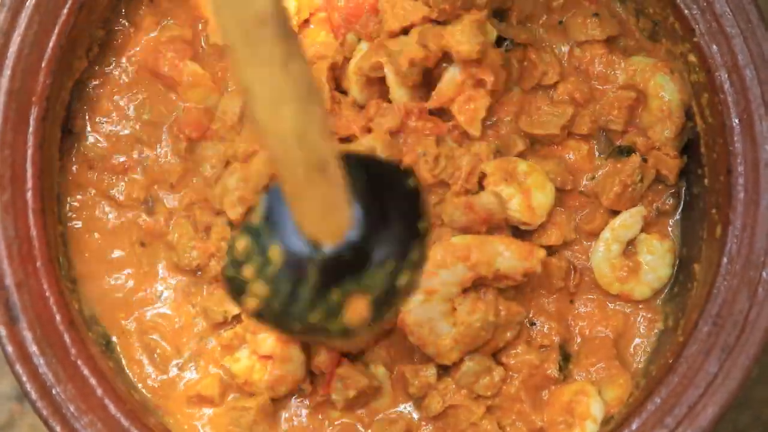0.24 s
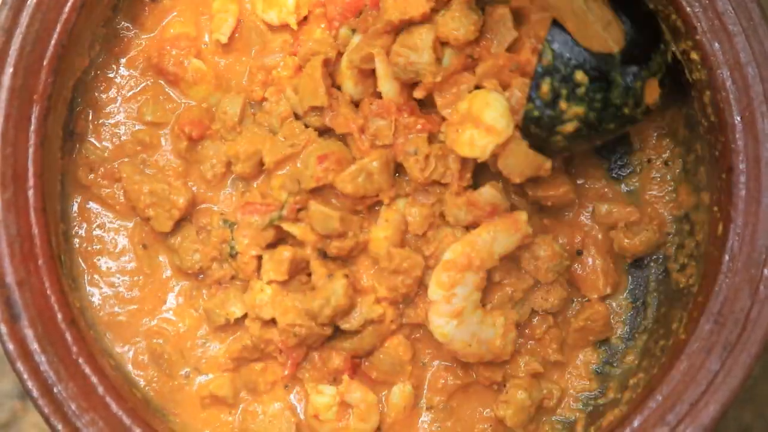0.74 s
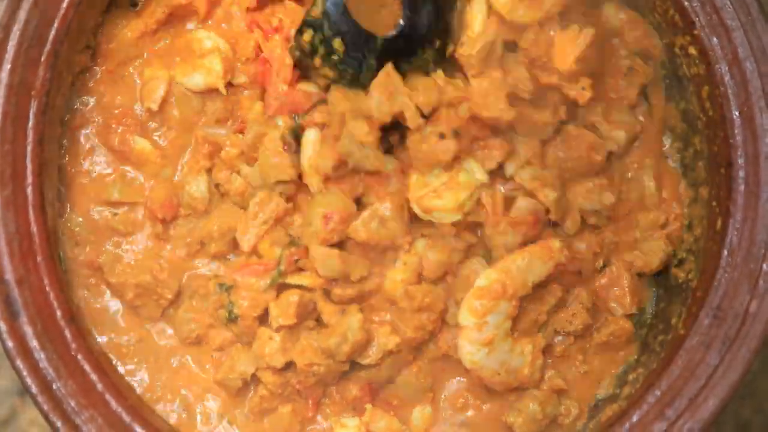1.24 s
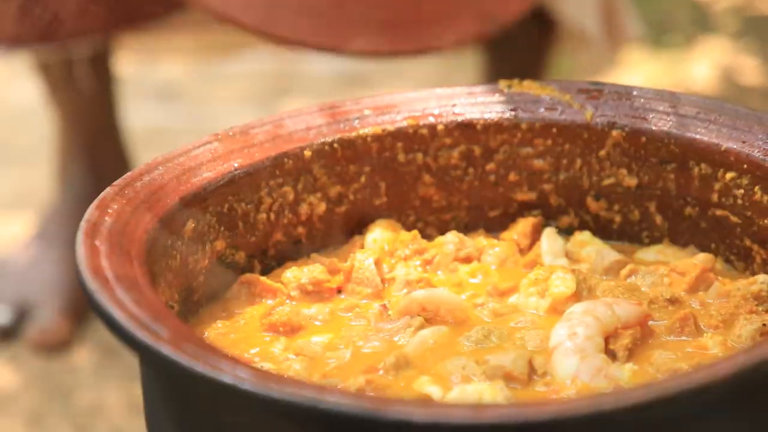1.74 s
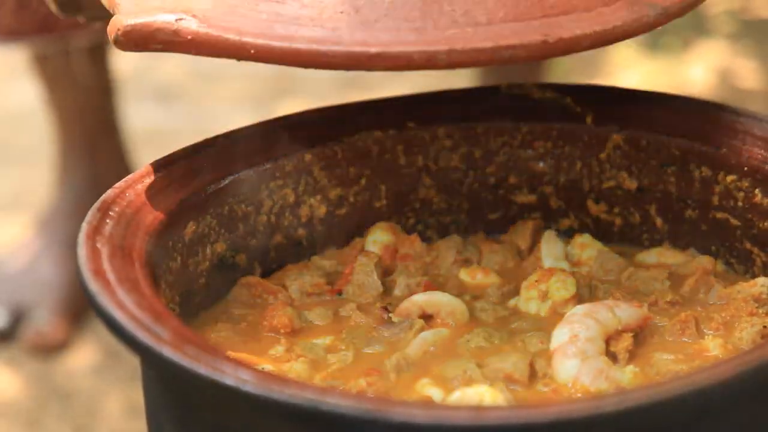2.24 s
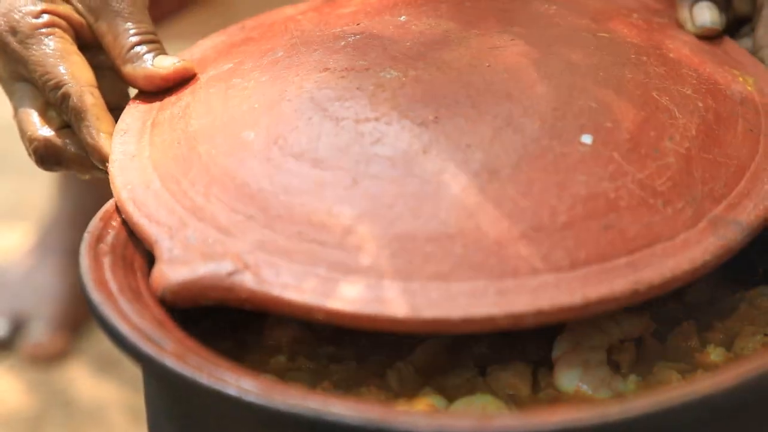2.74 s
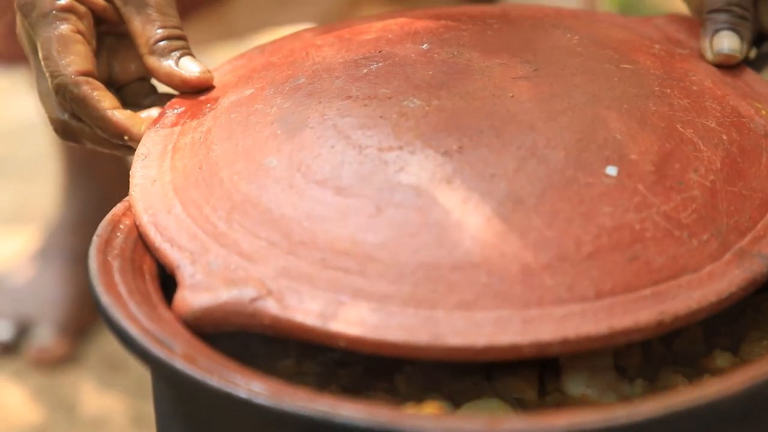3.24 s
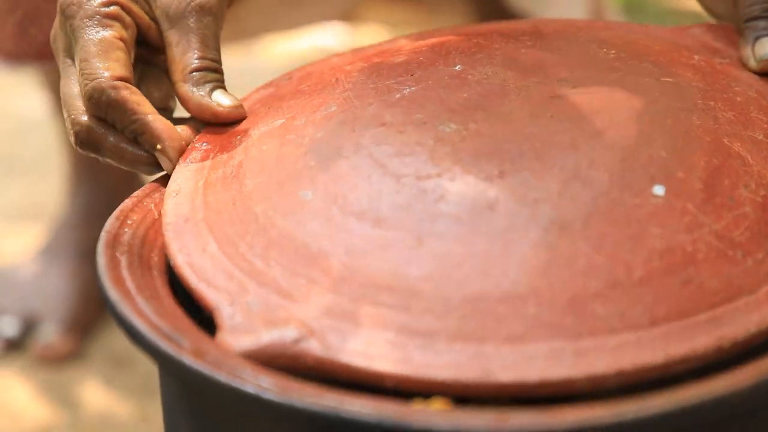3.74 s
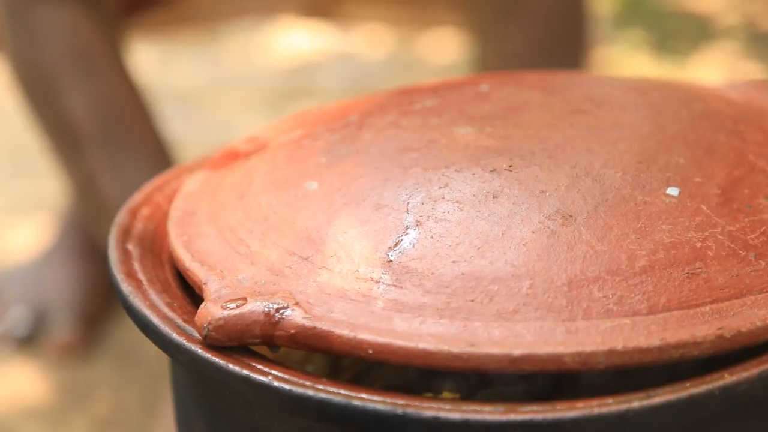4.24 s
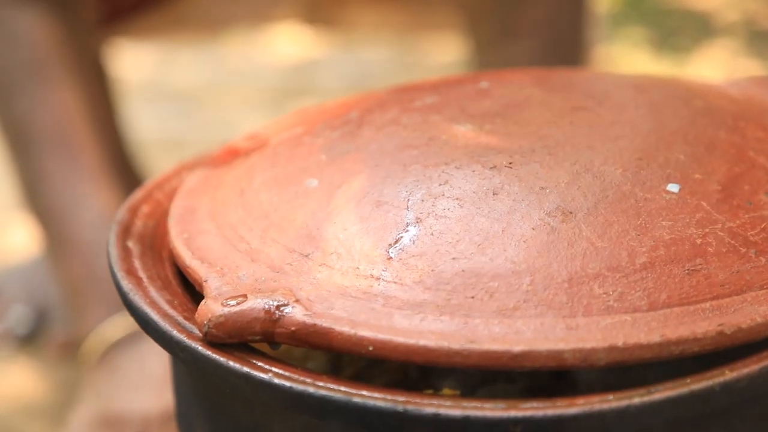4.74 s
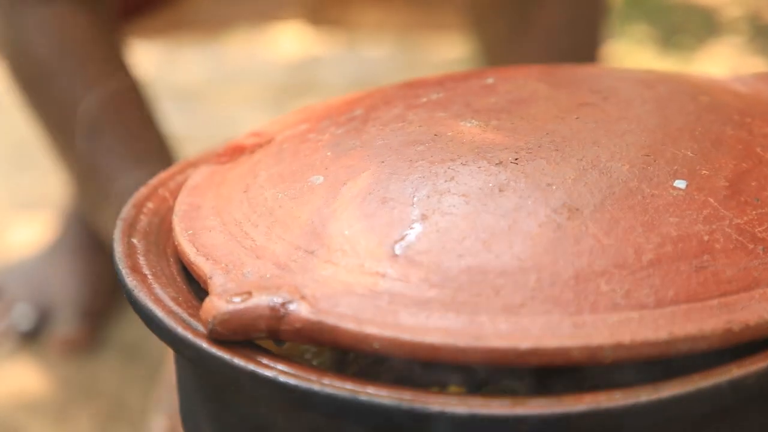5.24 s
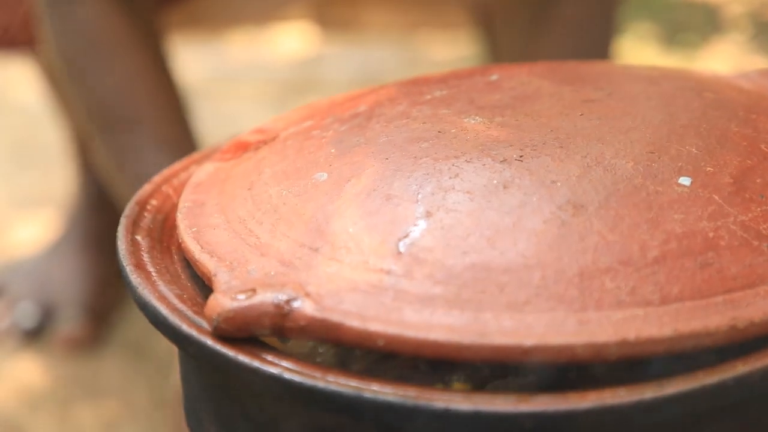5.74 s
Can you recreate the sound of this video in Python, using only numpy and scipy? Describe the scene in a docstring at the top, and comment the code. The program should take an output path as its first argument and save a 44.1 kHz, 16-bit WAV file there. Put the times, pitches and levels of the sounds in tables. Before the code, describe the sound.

Outdoors, close to a simmering clay pot, a coconut-shell ladle scrapes gritty clay, knocks sharply twice and ends in a short squeal. A heavy clay lid lands with hollow bumps and grinds into place. Afterwards feet crunch dry grit and the lid settles with small knocks. A bird gives four falling whistles with echoes from trees, over faint fizz and open air.

```python
"""Outdoors, curry simmers in a clay pot: fine fizz and wet ticks over open air and a low distant rumble.
A coconut-shell ladle scrapes gritty clay, knocks shell and pot into ringing, then sticks and slips into a squeal.
The clay lid lands with hollow bumps of trapped air and grinds into place; feet crunch dry grit.
A bird whistles pure falling notes, and the ground and trees send back echoes."""
import sys
import numpy as np
from scipy import signal
from scipy.fft import rfft, irfft
from scipy.io import wavfile
from scipy.ndimage import uniform_filter1d

SR = 44100
rng = np.random.default_rng(int(sys.argv[2]) if len(sys.argv) > 2 else 0)


def bounce(signal):
    """Save signal as a 16-bit WAV file at the path given by the first command-line argument."""
    frames = np.transpose(np.atleast_2d(signal))
    limited = np.clip(frames, -1, 1)
    pcm = np.round(limited * 32767).astype(np.int16)
    wavfile.write(sys.argv[1], SR, pcm)


N = 264600
TIME = np.arange(N) / SR

# ringing modes of the coconut shell: (frequency [Hz], level [dB], time to fall 60 dB [s])
SHELL_MODES = [(525, -22, 0.075), (763, -3, 0.017), (1376, -17.5, 0.04), (1632, -2.5, 0.019),
               (1838, -3.5, 0.019), (2190, -7.5, 0.016), (2544, 0, 0.0061), (3120, -23, 0.035),
               (3580, -20.5, 0.015), (6550, -36, 0.0065), (6940, -37, 0.0065)]
# ringing modes of the filled pot: (frequency [Hz], level [dB], time to fall 60 dB [s])
POT_MODES = [(464, -43, 0.031), (525, -7, 0.055), (711, -9, 0.069), (772, -11, 0.098), (867, -14, 0.073),
             (1111, -3.5, 0.039), (1218, -13, 0.18), (1330, -4.5, 0.034), (1600, -11.5, 0.081),
             (1655, -8, 0.039), (1733, -9, 0.085), (1850, -1.5, 0.028), (2000, -15, 0.066),
             (2075, -16, 0.2), (2300, -28, 0.24), (2513, -11.5, 0.043), (2820, -17.5, 0.073),
             (2987, -14, 0.055), (3190, -13, 0.014)]
# modes of the air trapped under the lid: (frequency [Hz], level [dB], time to fall 60 dB [s])
HOLLOW_MODES = [(128, -15, 0.15), (191, -18, 0.046), (451, 3.5, 0.025), (514, 3, 0.031)]
# ringing modes of the clay lid: (frequency [Hz], level [dB], time to fall 60 dB [s])
LID_MODES = [(625, -7, 0.015), (840, -6, 0.0087), (968, -12.5, 0.095), (1208, -20, 0.11),
             (1547, -4.5, 0.025), (1910, -2.5, 0.008), (2376, -2, 0.015), (2930, -9, 0.017),
             (3900, -16, 0.015), (4560, -18.5, 0.023), (5960, -16, 0.018), (6800, -36, 0.016),
             (7600, -15, 0.0077)]
# spectrum of clay grains catching: (frequency [Hz], level per Hz [dB])
GRAIN_SPECTRUM = [(200, -4.5), (500, -7), (780, 1.5), (1100, -4.5), (1900, -9.5), (2800, -4.5),
                  (4200, -16.5), (5200, -22.5), (6600, -11), (8000, -19), (10000, -17), (13000, -32),
                  (16000, -44)]
# spectrum of bright hiss and crunch: (frequency [Hz], level per Hz [dB])
RUSTLE_SPECTRUM = [(1000, -12), (3000, -16), (5000, 1), (7000, 8.5), (10000, 5), (13000, 0.5), (16000, -20)]
# the whole level dips briefly: (time [s], half length [s])
LEVEL_DIPS = [(1.526, 0.02), (3.957, 0.027)]


def from_db(db):
    """Turn decibels into a gain."""
    return 10 ** (np.asarray(db) / 20)


def rms_one(x):
    """Scale a signal to an rms (average strength) of 1."""
    return x / np.sqrt(np.mean(x ** 2) + 1e-20)


def colour(x, spectrum):
    """Give a steady signal a spectrum, with softer skirts beyond the table's ends; rms 1."""
    hz, db = np.transpose(spectrum)
    f = np.maximum(np.arange(N // 2 + 1) * SR / N, 1)
    skirts = np.minimum(f / hz[0], 1) ** 2 * np.minimum(hz[-1] / f, 1) ** 2
    gain = from_db(np.interp(np.log(f), np.log(hz), db))
    return rms_one(irfft(rfft(x) * skirts * gain, N))


def cut(x, hz, kind="low", order=2):
    """Filter away part of the spectrum (Butterworth)."""
    safe_hz = np.clip(hz, 10, SR / 2 - 500)
    return signal.sosfilt(signal.butter(order, safe_hz, kind, fs=SR, output="sos"), x + 1e-18)


def drift(top_hz):
    """Smooth random wandering with a spread of 1, no faster than about top_hz."""
    return rms_one(cut(rng.standard_normal(N), top_hz))


def click(s):
    """One click of height 1 at time s."""
    return 1. * (np.arange(N) == round(s * SR))


def fade(age, t60):
    """Die away by 60 dB in each t60 seconds, starting at age 0."""
    return from_db(-60 * np.clip(age / t60, 0, 4))


def burst(s, t60):
    """Noise that starts at once and dies away."""
    return rng.standard_normal(N) * (TIME >= s) * fade(TIME - s, t60)


def ring(force, modes, ratio=1, alternate=False):
    """Let a force set off decaying tones; a click of height 1 starts each mode at its table level."""
    out = np.zeros(N)
    for k, (hz, db, t60) in enumerate(modes):
        decay = np.exp(-np.log(1000) / (t60 * SR))
        turn = 2 * np.pi * hz * ratio / SR
        sign = (-1) ** k if alternate else 1
        feedback = [1, -2 * decay * np.cos(turn), decay * decay]
        out += sign * from_db(db) * signal.lfilter([0, np.sin(turn)], feedback, force + 1e-18)
    return out


def grains(per_s, spread_db):
    """Random tiny collisions of uneven size; rms 1."""
    sizes = from_db(spread_db * np.minimum(rng.exponential(1, N), 4)) * rng.choice([-1, 1], N)
    return rms_one(sizes * (rng.random(N) < per_s / SR))


def steady(x):
    """Even out the slow level, so that the hand's pressure can set it."""
    return x / np.sqrt(np.abs(uniform_filter1d(x * x, size=900)) + 1e-12)


def bell(x, centre, half):
    """A smooth hump of height 1 that has sunk to 0.61 at half from its centre."""
    return np.exp(-np.minimum(((x - centre) / half) ** 2, 100) / 2)


def stroke(start, length, attack_s, release_t60):
    """Envelope of a movement: a straight rise, a hold until its length is over, then a dying away."""
    age = TIME - start
    return np.clip(age / attack_s, 0, 1) * fade(age - length, release_t60)


def background(air_db=-44, rumble_db=-54, simmer_db=-58, sizzle_db=-41):
    """Noise makes open air and a swelling distant rumble; tiny collisions make the sauce's fizz."""
    # spectrum of the open air: (frequency [Hz], level per Hz [dB])
    air_spectrum = [(15, -45), (25, -14), (92, -9), (206, -6.5), (242, -13.5), (270, -8), (301, -14.5),
                    (796, -18), (1100, -14.5), (1520, -18.5), (1890, -16.5), (3430, -23), (5570, -42),
                    (10100, -37.5), (16000, -50.5)]
    # spectrum of the simmering sauce: (frequency [Hz], level per Hz [dB])
    simmer_spectrum = [(2000, 14.5), (5000, 11), (7000, 14.5), (10000, 8.5), (13000, 5), (16000, -20)]
    # swells of the rumble: (time of the peak [s], half length [s], level [dB])
    rumble_swells = [(2.376, 0.11, -46), (5.4, 0.61, -58)]
    air = from_db(air_db) * colour(rng.standard_normal(N), air_spectrum)
    swells = from_db(rumble_db) + sum(from_db(db) * bell(TIME, s, half) for s, half, db in rumble_swells)
    rumble = swells * rms_one(cut(rng.standard_normal(N), [82, 118], "band"))
    # sauce pushed up the hot wall sizzles
    sizzle = from_db(sizzle_db) * stroke(1.365, length=0.051, attack_s=0.051, release_t60=0.13)
    heat = from_db(simmer_db) + sizzle
    return air + rumble + heat * colour(grains(10000, 4.6), simmer_spectrum)


def ladle_grit(pot_db=-4, attack_s=0.002, sag_db=4.5):
    """Grains of bare clay catch the rubbing shell in clumps and stir the pot's modes."""
    # scrapes: (start [s], length [s], level [dB], time to fall 60 dB on release [s])
    scrapes = [(0, 0.043, -27.5, 0.088), (0.511, 0.066, -28.5, 0.22), (0.687, 0.098, -27, 0.034)]
    pressure = np.zeros(N)
    for s, length, db, t60 in scrapes:
        sag = sag_db * bell(TIME, s + length / 2, length / 4)   # each scrape bites hardest at its two ends
        pressure += stroke(s, length, attack_s, t60) * from_db(db - sag)
    force = grains(4000, 3.6) * from_db(2.5 * drift(110))
    pot = rms_one(ring(force, POT_MODES, alternate=True))
    return pressure * steady(colour(force, GRAIN_SPECTRUM) + from_db(pot_db) * pot)


def ticks(t60=0.031, top_hz=11000):
    """Wet ticks of the sauce and small grit clicks: short bright bursts of noise."""
    # ticks: (time [s], level before a 3 dB cut and the filter [dB])
    tick_list = [(.161, -32), (.962, -30.5), (1.257, -32.5), (1.3014, -23), (1.3944, -14), (3.808, -30.5),
                 (4.1533, -20.5), (5.335, -29)]
    spits = sum(from_db(db - 3.0) * burst(s, t60) for s, db in tick_list)
    return cut(spits, [6500, top_hz], "band")


def ladle_knocks(contact_width=1.31, crack_t60=0.0079, crack_hz=8000, tail_db=-27, tail_t60=0.079):
    """Each knock rings the shell and pot, over a dry crack and a faint scatter from the yard."""
    # knocks: (time [s], level [dB], pitch of the contact [Hz], pot ring [dB], crack [dB])
    knocks = [(0.5138, 1, 990, -24, -10.5), (.5453, -15, 547, -31, -26), (0.815, -21.5, 2600, -24, -4),
              (1.171, 5.5, 2300, -18, -8.5), (1.199, -22, 1520, -6.5, -30)]
    out = np.zeros(N)
    for s, db, contact_hz, pot_db, crack_db in knocks:
        contact_band = [contact_hz / contact_width, contact_hz * contact_width]
        force = 0.99 * cut(click(s), contact_band, "band", order=1)
        body = ring(force, SHELL_MODES) + from_db(pot_db) * ring(force, POT_MODES, alternate=True)
        crack = from_db(crack_db) * cut(burst(s, crack_t60), [330, crack_hz], "band")
        scatter = from_db(tail_db) * cut(burst(s, tail_t60), [400, 2600], "band")
        out += from_db(db) * (body + crack + scatter)
    return out


def drag_pressure(attack_s=.082, release_t60=0.055, ease_db_per_s=140):
    """The hand leans into each drag, then eases off towards a lighter, steady push."""
    # drags along the wall under the curry: (start [s], end [s], lean at its peak [dB], steady push [dB])
    drags = [(0.824, 1.29, -19, -47.5), (1.29, 1.501, -17.5, -28.5)]
    out = np.zeros(N)
    for s, end, peak_db, held_db in drags:
        lean = from_db(peak_db - ease_db_per_s * np.maximum(TIME - s - attack_s, 0))
        out += stroke(s, end - s, attack_s, release_t60) * (lean + from_db(held_db))
    return out


def stick_slip(pressure, judder_per_s=565, judder_rough=.65, squeal_rough=.07, slack_rough=.24):
    """Slips per second and their roughness: an uneven judder locks into a squeal."""
    # pitch of the squeal: (time [s], slips per second [Hz])
    squeal_pitch = [(1.325, 660), (1.345, 565), (1.362, 588), (1.386, 597), (1.405, 576), (1.428, 594),
                    (1.485, 556), (1.51, 575)]
    lock_start_s, lock_s = 1.31, .05
    squeal_s, squeal_hz = np.transpose(squeal_pitch)
    per_s = np.where(TIME < lock_start_s, judder_per_s, np.interp(TIME, squeal_s, squeal_hz))
    # the squeal is cleanest under full pressure and roughens as the hand eases off
    eased_rough = squeal_rough + slack_rough * (1 - pressure / pressure.max())
    locked = np.clip((TIME - lock_start_s) / lock_s, 0, 1)
    return per_s, judder_rough + locked * (eased_rough - judder_rough)


def ladle_drag(jitter=0.32, uneven_db=10.0, shell_db=-3, hiss_db=-35, low_cut_hz=800, soft_hz=3200,
               churn_db=-13, stray_db=-12):
    """The shell sticks and slips on the wall; when the slips lock into step it squeals."""
    pressure = drag_pressure()
    per_s, rough = stick_slip(pressure)
    turns = np.cumsum(per_s * np.exp(jitter * rough * drift(350))) / SR
    # one slip for each whole turn, of uneven size
    slips = np.diff(np.floor(turns), prepend=0) * from_db(uneven_db * rough * rng.standard_normal(N))
    # other spots of the shell catch out of step
    slips = steady(slips) + from_db(stray_db) * grains(700, 3.5)
    # the sauce softens every slip
    slips = cut(cut(slips, soft_hz, order=4), low_cut_hz, "high")
    pot = ring(slips, POT_MODES, alternate=True)
    body = steady(pot + from_db(shell_db) * ring(slips, SHELL_MODES))
    # the moving ladle loads the wall, so the ringing wanders a little in pitch
    body = np.interp(TIME + .00016 * rough * drift(14), TIME, body)
    # soft pieces rub the wall and wake mostly its low modes
    pieces = cut(grains(2500, 3.8), [430, 850], "band")
    churn = steady(ring(pieces, POT_MODES))
    hiss = colour(grains(2500, 4), RUSTLE_SPECTRUM)
    return pressure * (body + from_db(churn_db) * churn + from_db(hiss_db) * hiss)


def whistle(top_hz=6060, end_hz=2120, half_fall_s=.0765, steepness=3.55, level_db=-13):
    """One pure note hangs high, falls fast and levels out, loudest as its pitch falls through about 3 kHz."""
    swell_hz, swell_octaves, swell_db = 3067, 0.2, 11.5
    hz = end_hz + (top_hz - end_hz) / (1 + (TIME / half_fall_s) ** steepness)
    db = level_db + swell_db * bell(np.log2(hz), np.log2(swell_hz), swell_octaves)
    envelope = stroke(0, length=0.16, attack_s=0.023, release_t60=0.061)
    return envelope * from_db(db) * np.sin(2 * np.pi * np.cumsum(hz) / SR)


def bird(near_t60=0.36, far_t60=.6, far_db=-16, leaf_hz=3300, flutter_db=2, ground_s=.0021, ground_db=-12,
         fade_in_s=0.042):
    """The same whistle repeats; it beats with its ground echo, and trees scatter it into a trail."""
    # calls: (start [s], level [dB], tree echo [dB])
    calls = [(1.436, -21.5, -3), (2.711, -19, -3), (3.82, -27, 2), (4.976, -25, 0.5)]
    note, out = whistle(), np.zeros(N)
    for s, level_db, echo_db in calls:
        call = (note * from_db(flutter_db * drift(104)))[:SR // 2]
        trees = burst(s + .009, near_t60) + from_db(far_db) * burst(s + .009, far_t60)
        trees = cut(trees, leaf_hz, "high")   # leaves throw back the high start of the note best
        trees = trees / np.sqrt(np.sum(trees ** 2))
        ground = from_db(ground_db) * click(s + ground_s)
        paths = click(s) + ground + from_db(echo_db) * trees
        heard = from_db(level_db) * signal.oaconvolve(paths, call)[:N]
        for dip_s, _ in LEVEL_DIPS:
            if s < dip_s < s + .5:   # a call begun just before a dip is silent until it, then fades in
                heard = heard * np.clip((TIME - dip_s) / fade_in_s, 0, 1)
        out += heard
    return out


def shuffles(scuff_db=-1, sole_db=-51, feet_db=-59, restless_db=4.0, scuffs_per_s=220):
    """Each move of a foot crunches dry grit over a dull rub of the sole."""
    # shuffles: (time of the peak [s], half length [s], level [dB])
    shuffle_list = [(1.898, 0.0097, -53), (4.161, 0.021, -45.5), (4.235, 0.013, -53), (4.33, 0.008, -56),
                    (4.654, 0.07, -53), (5.414, 0.025, -47), (5.728, 0.036, -44)]
    # spectrum of the rubbing sole: (frequency [Hz], level per Hz [dB])
    scuff_spectrum = [(150, -54), (500, 23.5), (900, 5), (1500, 13), (2500, 7.5), (5000, -1.5)]
    moves = sum(from_db(db) * bell(TIME, s, half) for s, half, db in shuffle_list)
    # between shuffles the feet keep shifting their weight
    shifting = stroke(4.1, length=1.46, attack_s=0.016, release_t60=0.24) * from_db(restless_db * drift(9))
    crunch = colour(grains(3500, 3.2) * from_db(2.4 * drift(70)), RUSTLE_SPECTRUM)
    scuff = colour(grains(scuffs_per_s, 3), scuff_spectrum)
    crunch_level = moves + from_db(feet_db) * shifting
    scuff_level = from_db(scuff_db) * moves + from_db(sole_db) * shifting
    return crunch_level * crunch + scuff_level * scuff


def lid_bumps(clay_db=-2, rattle_db=-7.0, rattle_t60=0.13, rock_s=0.004175, rock_db=0):
    """The lid lands, rocks onto a second point and pumps the pot's air, which booms as the rim rattles."""
    # bumps: (time [s], level [dB], pitch of the trapped air [ratio], hardness [Hz], boom [dB])
    bumps = [(2.848, -14.5, 1.16, 1020, 2), (2.972, -15, 1.05, 840, 2), (3.077, -16, 1.06, 1110, 4),
             (3.592, -28.5, 0.79, 2520, 4.5), (3.807, -32.5, .76, 4940, 2.5), (4.17, -28, 0.77, 2740, -11),
             (4.272, -35, 1.22, 1200, -0.5), (4.579, -25.5, 1.22, 1800, -11.5),
             (4.817, -17, 1.285, 1040, -10), (5.892, -29, 1.18, 920, -14)]
    out = np.zeros(N)
    for s, db, ratio, hard_hz, boom_db in bumps:
        second_point = from_db(rock_db) * cut(click(s + rock_s), hard_hz)
        force = cut(click(s) + second_point, hard_hz)
        boom = from_db(boom_db) * ring(force, HOLLOW_MODES, ratio, alternate=True)
        clay = from_db(clay_db) * ring(force, LID_MODES, alternate=True)
        rattle = cut(cut(burst(s, rattle_t60), hard_hz, order=3), 310, "high")
        out += from_db(db) * (boom + clay + 2 * from_db(rattle_db) * rattle)
    return out


def lid_slide(closed_ratio=0.916, hollow_db=1.5, sand_db=-20, rub_db=-9, release_t60=0.3, wobble_hz=26.4,
              wobble_db=2.5):
    """Clay grinds on clay as the lid wobbles; with the gap nearly shut the trapped air sounds lower."""
    # pushes along the rim: (start [s], length [s], level [dB], attack [s])
    pushes = [(3.035, 0.1, -40, 0.013), (3.447, 0.11, -32, .055), (3.588, 0.057, -33, 0.0044)]
    pressure = np.zeros(N)
    for s, length, db, attack_s in pushes:
        wobble = wobble_db * np.cos(2 * np.pi * wobble_hz * (TIME - s))
        pressure += stroke(s, length, attack_s, release_t60) * from_db(db + wobble)
    force = grains(1200, 3) * from_db(3 * drift(80))
    hollow = ring(force, HOLLOW_MODES, closed_ratio, alternate=True)
    body = ring(force, LID_MODES, alternate=True) + from_db(hollow_db) * hollow
    sand = from_db(sand_db) * colour(force, RUSTLE_SPECTRUM)
    rub = from_db(rub_db) * colour(grains(2500, 3.3), GRAIN_SPECTRUM)
    return pressure * (steady(cut(body, 145, "high")) + sand + rub)


def scene():
    """Pot, ladle, bird, feet and lid at one microphone."""
    ladle = ladle_grit() + ladle_knocks() + ladle_drag()
    lid = lid_bumps() + lid_slide()
    return (background() + ladle + ticks() + bird() + shuffles() + lid)[None]


def record(dry):
    """Dip the level twice, clip peaks beyond full scale, and cut the deep bass and the top."""
    for s, half in LEVEL_DIPS:
        dip = np.exp(-np.minimum((1.56 * (TIME - s) / half) ** 2, 100))
        dry = dry * from_db(-32 * dip)
    loud = cut(np.clip(dry, -1, 1), 54, "high")
    top_cut = signal.ellip(10, .1, 80, 15800, fs=SR, output="sos")   # steep low-pass at 15800 Hz
    return signal.sosfilt(top_cut, loud)


dry = scene()
out = record(dry)
bounce(out)
```